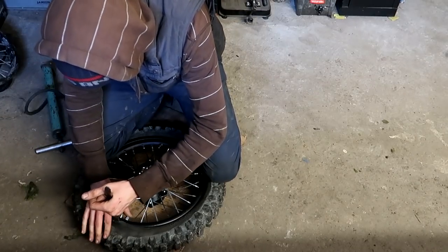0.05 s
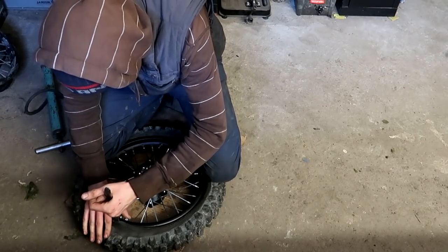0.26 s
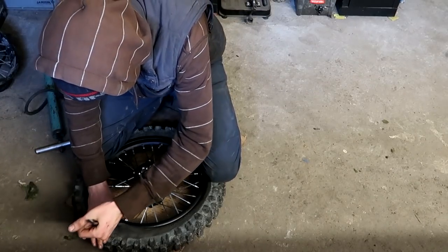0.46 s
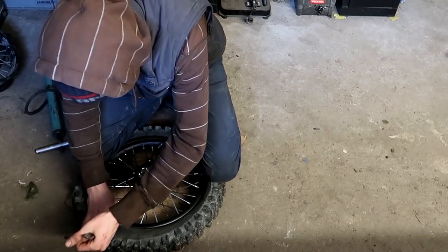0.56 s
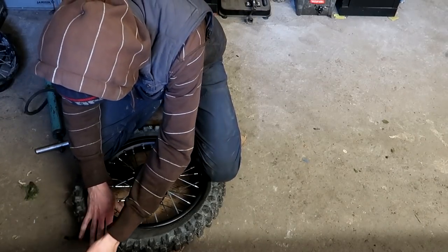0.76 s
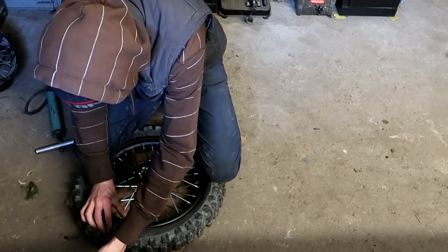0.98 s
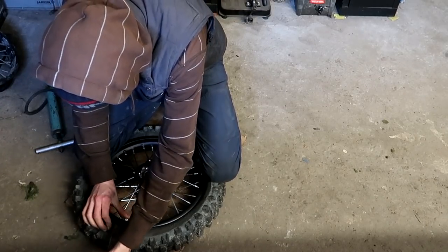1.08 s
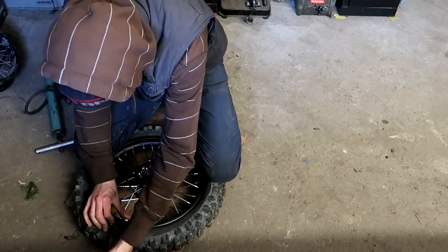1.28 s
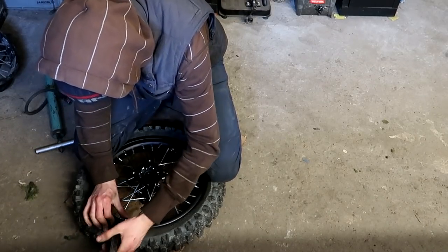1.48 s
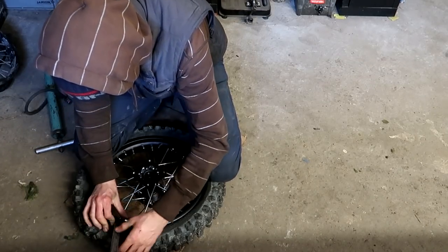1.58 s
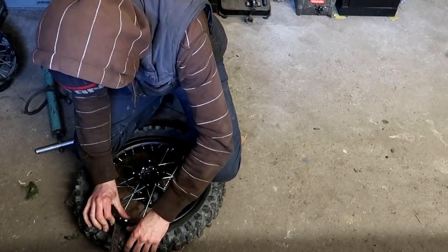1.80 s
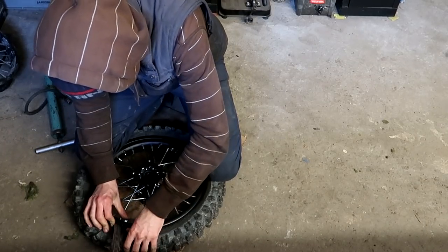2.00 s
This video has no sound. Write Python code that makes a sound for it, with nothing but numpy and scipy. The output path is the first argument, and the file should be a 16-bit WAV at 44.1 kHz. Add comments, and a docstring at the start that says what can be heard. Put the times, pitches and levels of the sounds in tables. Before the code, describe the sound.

A steel tyre lever clacks hard against a spoked wheel rim, with a short jangling ring; then dull rubber bumps, sleeve rustle and faint scrapes follow in a quietly humming garage, heard close in stereo.

```python
"""On a garage floor, a steel tyre lever pries a tyre bead onto a spoked wheel.
Low hum, steady hiss, rustling sleeves and faint grainy scrapes run from the start: sines and coloured noise.
The lever snaps against the rim in one quick burst: cracks and dying noise, with rim, spokes and tyre
ringing on as damped sines. The wheel rocks in low swells, then come dull bumps of rubber, ringing and echoing."""
import sys
import numpy as np
from scipy import signal
from scipy.fft import rfft, irfft, next_fast_len
from scipy.io import wavfile

SR = 44100
rng = np.random.default_rng(int(sys.argv[2]) if len(sys.argv) > 2 else 0)


def transcribe(signal):
    """Save signal, clipped to [-1, 1], as a 16-bit WAV file at the path in sys.argv[1]."""
    frames = np.atleast_2d(signal).T
    limited = np.clip(frames, -1, 1)
    pcm = np.round(limited * 32767).astype(np.int16)
    wavfile.write(sys.argv[1], SR, pcm)


N = 90404  # length in samples

# How much the two microphone ports differ.
# Each row: frequency in Hz, level of the difference against the shared sound in dB.
PORT_SPREAD = [(100, -24), (1200, -19.5), (2500, -23.5), (5000, -3.5), (12000, -9)]
ROOM_SPREAD_DB = 19  # extra difference for sounds that reach the ports from all around
MODE_RISE_S = 0.00067  # build-up time of the wheel's ringing


def undb(db):
    """Turn decibels into a gain."""
    return 10 ** (np.asarray(db) / 20)


def at_hz(points, f):
    """Read a table at any frequency, with straight lines on a log-frequency axis."""
    p = np.array(points, float)
    return np.interp(np.log(np.maximum(f, 1)), np.log(p[:, 0]), p[:, 1])


def clock():
    """Time of every sample in seconds."""
    return np.arange(N) / SR


def freqs():
    """Frequencies in Hz of a spectrum slightly longer than the scene."""
    size = 2 * next_fast_len(N // 2 + 1, real=True)
    return np.arange(size // 2 + 1) * SR / size


def noise(spectrum, spread_db=0):
    """Coloured stereo noise: a shared part of rms 1, plus a difference that is weak in the bass."""
    f = freqs()
    white = rng.standard_normal((2, len(f))) + 1j * rng.standard_normal((2, len(f)))
    gain = undb(at_hz(spectrum, f))
    side_gain = gain * undb(np.minimum(at_hz(PORT_SPREAD, f) + spread_db, 0))
    mid, side = irfft(white * [gain, side_gain])[:, :N]
    return (mid + side * np.array([[1], [-1]])) / mid.std()


def ring(modes, rise_s):
    """Damped sines that build up quickly, each arriving a hair early or late."""
    t = clock()
    arrival_scatter_s = .00014
    late = arrival_scatter_s * rng.standard_normal(len(modes))
    total = 0
    for k, (hz, db, t60) in enumerate(modes):
        sign = (-1) ** k  # every other mode starts the opposite way
        total = total + sign * undb(db - 60 * t / t60) * np.sin(2 * np.pi * hz * (t - late[k]))
    return (1 - np.exp(-t / rise_s)) * total


def fade(x, t60s):
    """Split a sound into octaves and let each die away at its own rate."""
    centres, f = 2. ** np.arange(7, 15), freqs()
    spectrum = rfft(x, 2 * (len(f) - 1))
    octave = np.log2(np.maximum(f, 1))
    total = 0
    for centre in centres:
        # this octave's share slopes to zero at its neighbours, so all shares add up to one
        share = np.interp(octave, np.log2(centres), 1. * (centres == centre))
        band = irfft(spectrum * share)[:, :N]
        total = total + band * undb(-60 * clock() / at_hz(t60s, centre))
    return total


def later(x, s):
    """Start a sound at s seconds."""
    start = int(np.clip(s * SR, 0, N - 1))
    return np.concatenate([np.zeros_like(x[..., :start]), x[..., :N - start]], axis=-1)


def garage():
    """The room's steady hiss and rumble is coloured noise; the faint hum is a few sines."""
    # Colour of the room's noise. Each row: frequency in Hz, relative level in dB per Hz.
    room_colour = [(15, -39), (25, -6), (101, -2), (427, -4.5), (833, -12), (1000, -13), (1420, -14.5),
                   (2180, -18), (2850, -22), (3180, -23), (3440, -22), (11800, -35), (15000, -70)]
    # Tones of the hum. Each row: frequency in Hz, rms level in dB.
    hum_tones = [(59.3, -66.5), (118.6, -64.5), (177.8, -66)]
    room_db = -55.5
    hum = 0
    for hz, db in hum_tones:
        # the root of two turns an rms level into a peak
        hum = hum + np.sqrt(2) * undb(db) * np.sin(2 * np.pi * (hz * clock() + rng.random()))
    return undb(room_db) * noise(room_colour, ROOM_SPREAD_DB) + hum


def grain():
    """Uneven grip: a level of rms 1 that heads for a new random value many times a second."""
    grains_per_s, scatter_db = 1900, 3
    steps = undb(scatter_db * rng.standard_normal(N))
    grip = np.interp(clock() * grains_per_s, np.arange(N), steps)
    return grip / np.sqrt(np.mean(grip ** 2))


def rustle():
    """Sleeves and hands rub on the tyre as the arms move: grainy noise of changing level."""
    # Loudness of the rubbing. Each row: time in seconds, level in dB.
    rub_level = [(0, -58), (.15, -62), (.45, -60), (.6, -53.5), (.8, -57.5), (1.0, -56), (1.2, -57),
                 (1.45, -58.5), (1.6, -59.5), (1.85, -61), (2.04, -61.5)]
    # Colour of the rubbing. Each row: frequency in Hz, relative level in dB per Hz.
    rub_colour = [(60, -18), (150, -1.5), (330, 2), (650, -7), (1200, -13.5), (2600, -14), (5000, -20.5),
                  (10000, -33.5), (15000, -30)]
    level_db = np.interp(clock(), *np.array(rub_level).T)
    return noise(rub_colour, ROOM_SPREAD_DB) * grain() * undb(level_db)


def scrapes():
    """Short slides of steel on rubber and rubber on the rim: swells of grainy noise in one band."""
    # Scrapes of the lever and low rubs of the bead. Each row: middle in seconds, half length in seconds,
    # level in dB, centre frequency in Hz, width in octaves.
    slides = [(0.054, 0.017, -60.5, 2310, .6), (0.16, 0.044, -58, 305, 0.68),
              (0.178, 0.014, -62.5, 3220, 0.47), (0.547, 0.025, -75, 6000, 1.),
              (0.672, 0.015, -58, 2000, 0.89), (0.752, 0.036, -53, 250, 0.32),
              (0.856, 0.044, -67.5, 3000, 0.59), (0.984, 0.041, -52.5, 278, 0.31),
              (1.055, 0.039, -63, 2400, 0.37), (1.27, 0.03, -62.5, 2190, .9), (1.337, 0.013, -58, 1200, .3),
              (1.364, 0.028, -52, 190, 0.26), (1.368, 0.027, -58.5, 630, 0.25),
              (1.469, 0.043, -54.5, 277, 0.25), (1.485, 0.024, -54, 646, 0.32),
              (1.481, 0.035, -61.5, 2980, 1), (1.487, 0.013, -70, 5900, 0.14),
              (1.763, 0.031, -59, 1320, .6)]
    out, grip = 0, grain()
    for s, half_length, db, hz, octaves in slides:
        f = np.geomspace(50, 16000, 60)
        band_db = -np.minimum(10 * (np.log2(f / hz) / octaves) ** 2 / 2, 60)
        band = np.column_stack([f, band_db])
        swell = np.exp(-((clock() - s) / half_length) ** 2)
        out = out + undb(db) * swell * noise(band, ROOM_SPREAD_DB)
    return out * grip


def spokes(count=70):
    """Many thin modes of unequal strength ring; their phases differ between the two ports."""
    # Typical strength of one spoke mode. Each row: frequency in Hz, level in dB.
    mode_level = [(1300, -35.5), (1750, -30.5), (2050, -45.5), (2750, -42), (3200, -48), (3800, -43.5),
                  (5200, -53), (9000, -69)]
    typical_t60_s, scatter_db = 0.32, 5
    draws = rng.standard_normal((count, 4))
    low, high = mode_level[0][0], mode_level[-1][0]
    # one random pitch in each of many equal slices of the log-frequency range
    hz = low * (high / low) ** ((np.arange(count) + rng.random(count)) / count)
    t = clock()[:N // 3]
    out = np.zeros((2, N))
    for f, (size, length, phase, side) in zip(hz, draws):
        t60 = typical_t60_s * np.exp(0.13 * length)
        start_db = at_hz(mode_level, f) + scatter_db * size
        fall = undb(start_db - 60 * t / t60) * (1 - np.exp(-t / MODE_RISE_S))
        apart = side * undb(at_hz(PORT_SPREAD, f)) * np.array([[1], [-1]])
        out[:, :len(t)] += fall * np.sin(2 * np.pi * (f * t + phase) + apart)
    return out


def clack():
    """Contacts crack and set wheel and garage jangling; steel ticks, the bead thumps, the wheel rings on."""
    # Contacts of the lever with the rim. Each row: start in seconds, level in dB.
    contacts = [(0.238, -17.5), (0.2416, -3.5), (0.2468, 0.5), (0.2506, -1.5), (0.2634, -5)]
    # Colour of the dense ring of wheel and garage. Each row: frequency in Hz, relative level in dB per Hz.
    jangle_colour = [(40, -45), (115, -8.5), (170, -14), (330, -1.5), (500, -16), (600, -11), (980, -6.5),
                     (1600, -6.5), (2050, -14), (2400, -6), (2900, -10), (3200, -20), (3800, -14.5),
                     (5000, -27), (8000, -32), (11500, -34.5), (15000, -55)]
    # How that ring dies. Each row: frequency in Hz, time to fall by 60 dB in seconds.
    jangle_t60 = [(100, 0.58), (400, 0.38), (1500, 0.3), (3500, 0.3), (7000, 0.31), (12000, 0.11)]
    # Bright tick of steel on steel. Each row: frequency in Hz, relative level in dB per Hz.
    tick_colour = [(2000, -11), (5000, -18), (9000, 0), (12500, 10), (15000, -2)]
    # Rim modes. Each row: frequency in Hz, level in dB, time to fall by 60 dB in seconds.
    rim_modes = [(743.5, -38, .75), (750, -34.5, .75), (757, -27, .24), (853, -27, .24), (899, -29, .25),
                 (1071, -23.5, .23), (1087, -25, .33), (1214, -28, .25), (1232, -23.5, .24),
                 (1284, -27, .31), (1451, -25, .28), (1542, -24, .28), (1650, -22, .25), (1746, -19.5, .23),
                 (1905, -25, .25), (2218, -30, .25), (2364, -30, .3), (2633, -28, .24), (2966, -31, .26)]
    # Modes of the tyre and the air in it. Each row: frequency in Hz, relative level in dB,
    # time to fall by 60 dB in seconds.
    tyre_modes = [(214, -21, .24), (270, -25, .28), (285, -23, .21), (336, -25, .29), (353, -24, .34),
                  (374, -24, .25), (426, -25, .25), (461, -28, .25)]
    # The bead's thump as the lever lets go. Each row: frequency in Hz, level in dB,
    # time to fall by 60 dB in seconds.
    thump_modes = [(221.4, -21.5, 0.052), (360, -15.5, 0.051)]
    jangle_db, jangle_rise_s = -21, 0.003
    crack_db, crack_hz, crack_s = -14.5, 1500, 0.0013
    tick_at_s, tick_db, tick_s = .2485, -37, 0.0037
    thump_at_s, ring_from_s = .2415, .244
    tyre_db = 1.5
    body_low_hz = 154  # the wheel radiates little below this pitch

    t = clock()
    crack = undb(crack_db) * np.sin(2 * np.pi * crack_hz * t) * np.exp(-t / crack_s)
    tick = undb(tick_db) * noise(tick_colour) * np.exp(-t / tick_s)
    out = later(tick, tick_at_s)
    for s, db in contacts:
        rise = 1 - np.exp(-t / jangle_rise_s)
        jangle = undb(jangle_db) * fade(noise(jangle_colour), jangle_t60) * rise
        out = out + undb(db) * later(jangle + crack, s)
    rim = ring(rim_modes, MODE_RISE_S)
    tyre = undb(tyre_db) * ring(tyre_modes, MODE_RISE_S)
    thump = ring(thump_modes, MODE_RISE_S)
    body = later(rim + tyre + spokes(), ring_from_s) + later(thump, thump_at_s)
    return out + signal.lfilter(*signal.butter(2, body_low_hz, "high", fs=SR), body)


def rocking():
    """The wheel settles on its tyre: low sines that swell and sink."""
    # Rocks of the wheel. Each row: middle in seconds, frequency in Hz, level in dB, half length in seconds.
    swells = [(0.269, 71, -44, 0.016), (0.312, 72, -41.5, .025), (0.382, 55, -46, .025)]
    t = clock()
    out = 0
    for s, hz, db, half_length in swells:
        swell = np.exp(-((t - s) / half_length) ** 2)
        out = out + undb(db) * swell * np.sin(2 * np.pi * hz * (t - s))
    return out


def bumps():
    """Soft blows ring the rubber and echo in the garage; a low-pass sets how dull each one is."""
    # Bumps of the bead and the hands. Each row: start in seconds, level in dB, low-pass cutoff in Hz.
    blows = [(.634, -8, 1830), (0.6443, -4, 600), (0.6475, 1.5, 1680), (.668, -11.5, 4500),
             (.692, -11, 1500), (.712, -9, 900), (0.725, -29, 500), (.812, -14, 600), (0.959, -16.5, 400),
             (1.342, -15, 1200), (1.47, -22, 1230), (2.025, -12, 500)]
    # Rubber's short modes. Each row: frequency in Hz, relative level in dB,
    # time to fall by 60 dB in seconds.
    rubber_modes = [(131, -43.5, 0.24), (216, -41, 0.093), (304, -45.5, 0.074), (377.6, -31, 0.048),
                    (667, -39, 0.039)]
    # Colour of a bump's echo. Each row: frequency in Hz, relative level in dB per Hz.
    echo_colour = [(50, -9.5), (130, 3), (380, 0), (550, -9), (1000, -11), (2500, -15.5), (5000, -39),
                   (12000, -61)]
    echo_db, echo_t60_s = -37.5, 0.3
    out, thud = 0, ring(rubber_modes, 0.00021)
    for s, db, hz in blows:
        echo = noise(echo_colour) * undb(echo_db - 60 * clock() / echo_t60_s)
        dull = signal.lfilter(*signal.butter(1, min(hz, SR / 3), fs=SR), thud + echo)
        out = out + undb(db) * later(dull, s)
    return out


def ports(x):
    """The right microphone port hears the work a moment later: a tiny delay made in the spectrum."""
    lag_ms = 0.027
    f = freqs()
    delay = np.exp(-2j * np.pi * f * lag_ms / 1000)
    right = irfft(rfft(x[1], 2 * (len(f) - 1)) * delay)[:N]
    return np.array([x[0], right])


def scene():
    """The work on the wheel, in the garage."""
    work = rustle() + scrapes() + clack() + rocking() + bumps()
    return garage() + ports(work)


def record(dry):
    """The recorder cuts the top with a steep low-pass."""
    top_hz = 14800
    return signal.sosfilt(signal.ellip(8, .2, 70, top_hz, fs=SR, output="sos"), dry)


dry = scene()
out = record(dry)
transcribe(out)
```